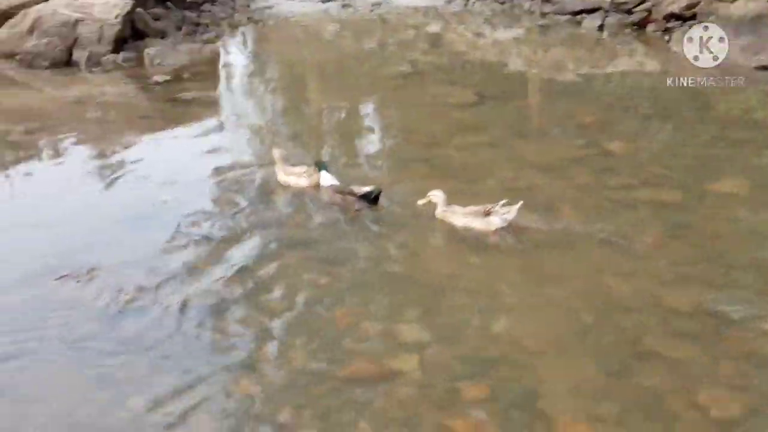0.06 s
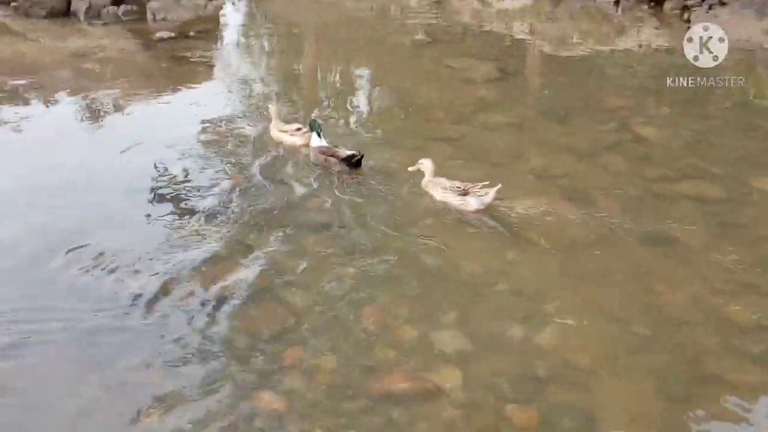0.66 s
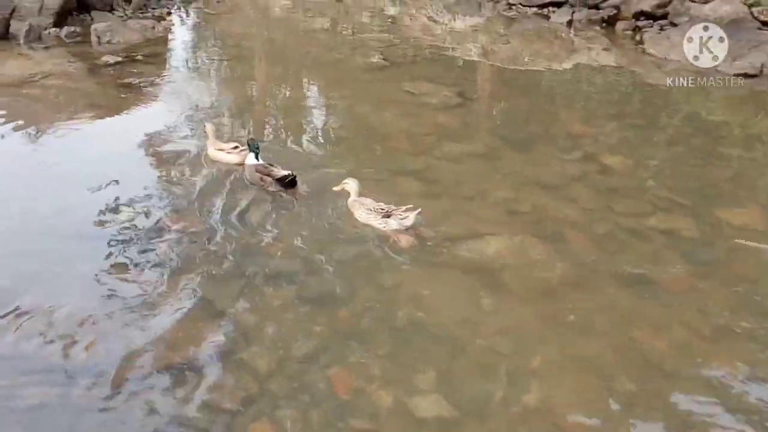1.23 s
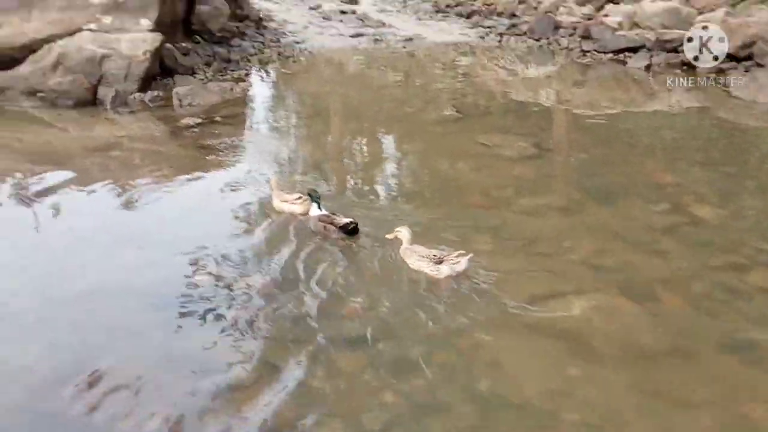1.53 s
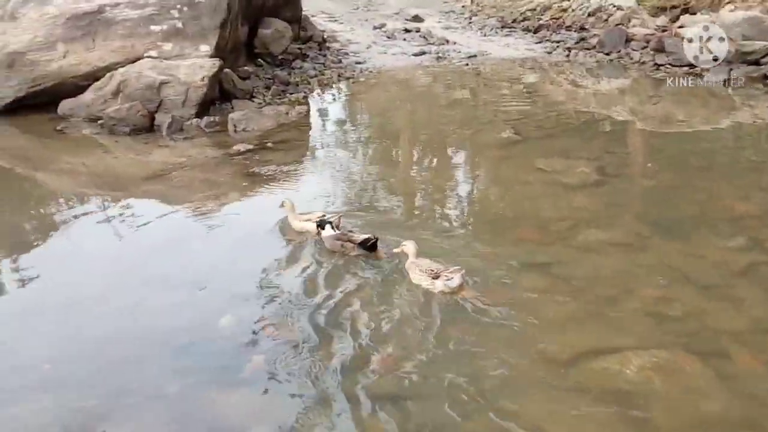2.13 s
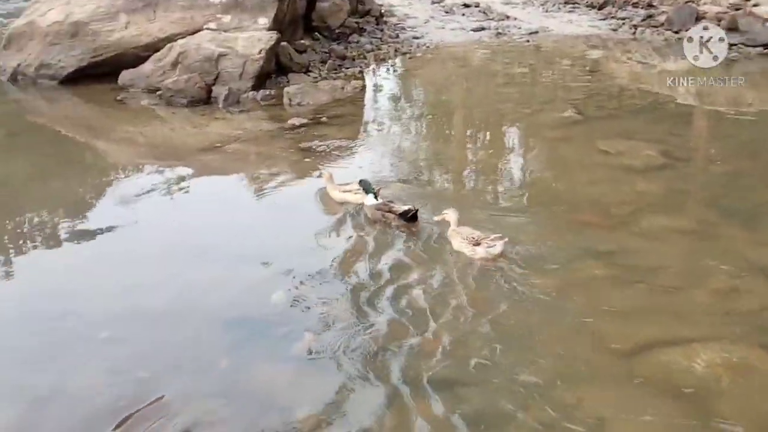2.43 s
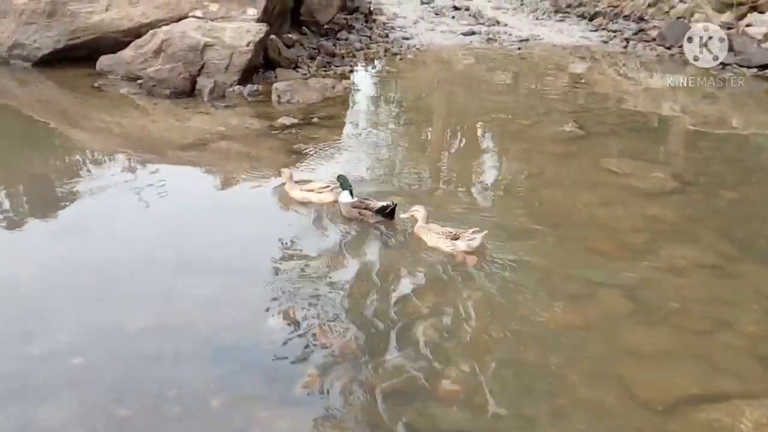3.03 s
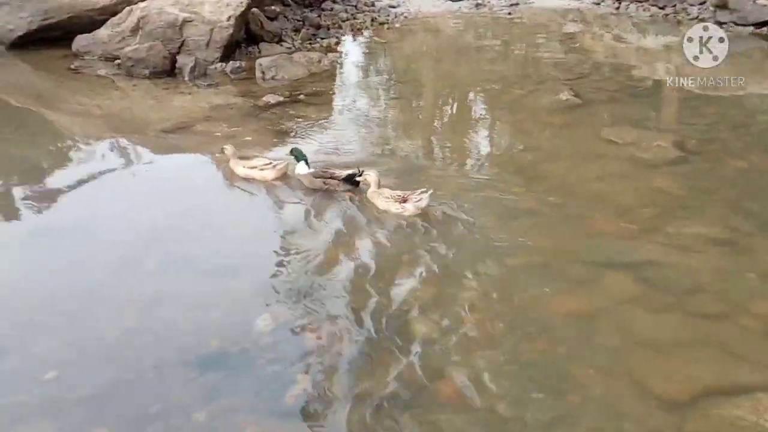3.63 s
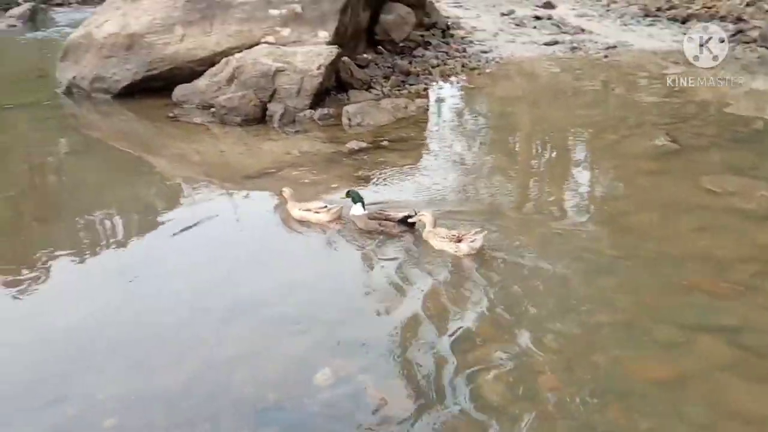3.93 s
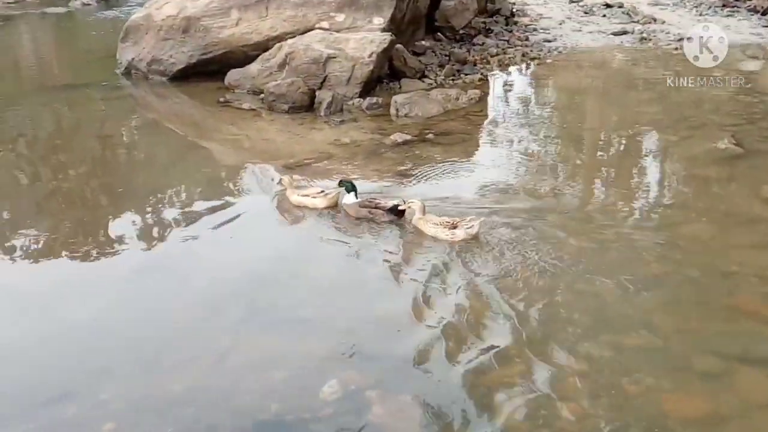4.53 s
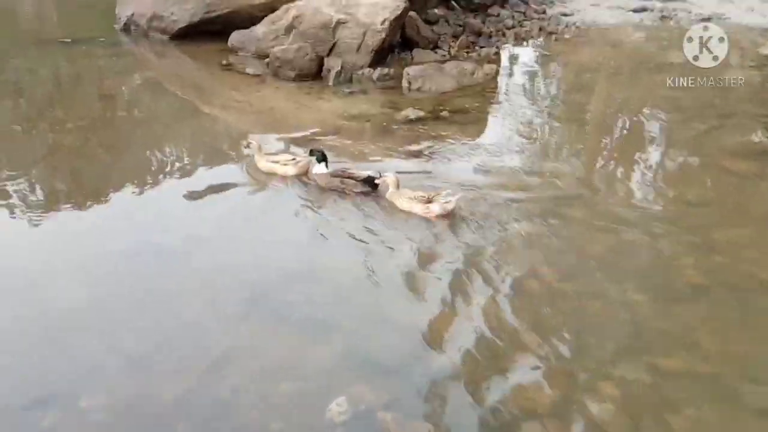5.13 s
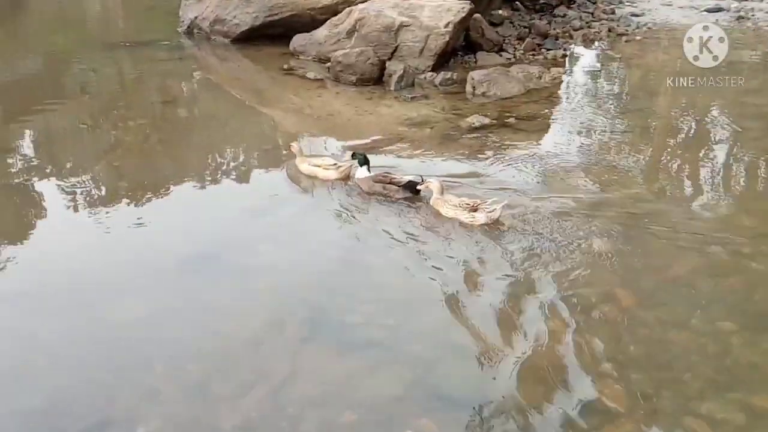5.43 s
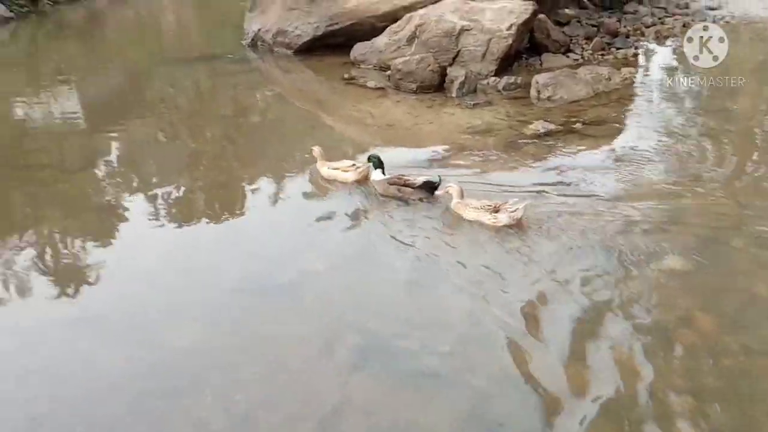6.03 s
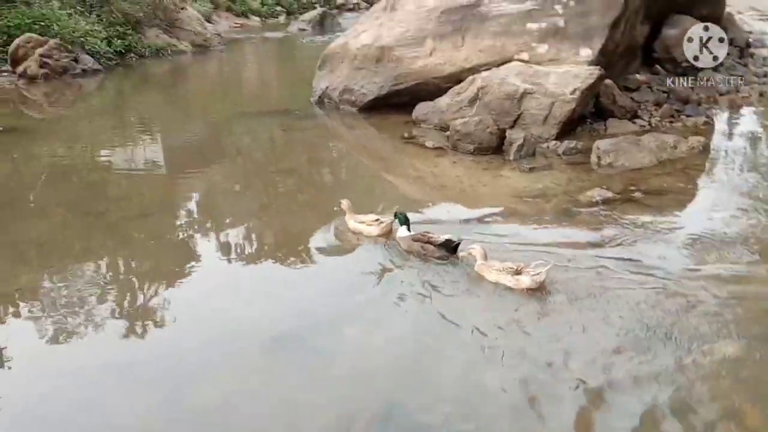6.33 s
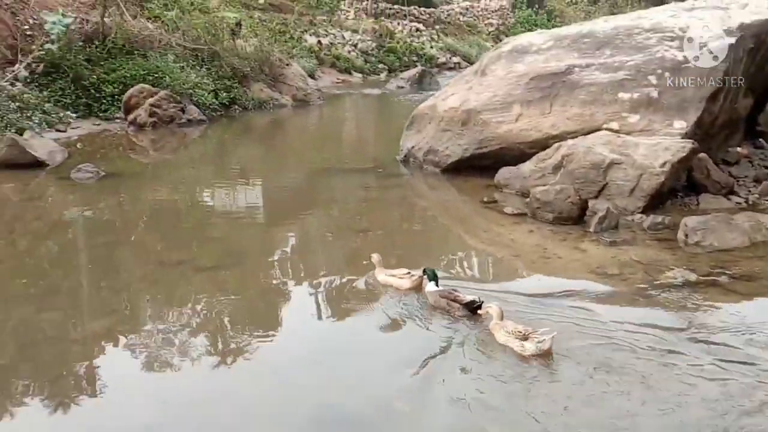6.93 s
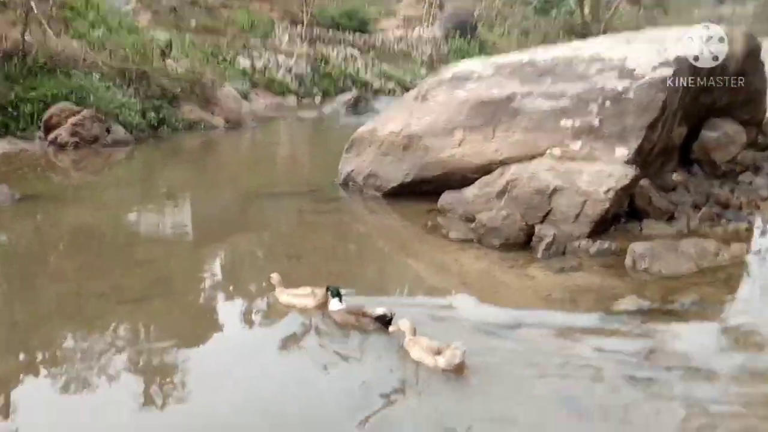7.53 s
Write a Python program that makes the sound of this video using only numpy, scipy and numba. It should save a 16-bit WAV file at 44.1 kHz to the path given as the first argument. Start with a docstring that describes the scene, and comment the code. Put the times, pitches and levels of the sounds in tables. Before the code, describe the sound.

Slow wading steps push through shallow water in bubbly surges, with plops, pattering drips and keys clinking lightly.

```python
"""Wading a shallow stream

Close to the microphone someone takes seven slow strides, each a surge of ringing bubbles from deep gulps
to fine spray. Cavities plop shut, drops slap the surface, feet thud on the bed and keys clink.
Insects hiss on the bank; a small bird and a far-off fowl call faintly, with short echoes off the rocks."""
import sys
import numpy as np
from scipy import signal
from scipy.fft import rfft, irfft
from scipy.io import wavfile
from numba import njit

SR = 44100
rng = np.random.default_rng(int(sys.argv[2]) if len(sys.argv) > 2 else 0)


def output_pcm(signal):
    """Save a mono or channel-first signal as 16-bit PCM at the path in sys.argv[1].

    Samples are clipped to [-1, 1] before scaling.
    """
    pcm = np.clip(np.atleast_2d(signal).T, -1, 1) * 32767
    wavfile.write(sys.argv[1], SR, np.round(pcm).astype(np.int16))


N = 342216
TIME = np.arange(N) / SR

# One surge of water per stride, and a weak second push after the sixth: leg enters t/s, crest t/s, hold/s,
# leg stops t/s, entry boost/dB, then base level/dB of gulps, slosh, splash, spray, mist, trickle
STRIDES = [(-.3, 0, .2, .62, 0, -51.5, -51, -58.5, -69, -78.5, -68),
           (0.859, 1.038, .4, 1.65, 3, -67, -58.5, -65.5, -81, -95, -71),
           (2.05, 2.282, .25, 2.82, 0, -53, -52.5, -59.5, -71.5, -78, -65),
           (3.241, 3.55, .07, 3.96, -.5, -57.5, -53, -58, -77.5, -94.5, -62.5),
           (4.32, 4.581, .28, 5.03, 0, -57, -55, -60, -68, -77, -69),
           (5.459, 5.769, .13, 6.0, -4, -53.5, -49.5, -55.5, -71, -85.5, -68.5),
           (5.98, 6.091, .06, 6.32, 2, -66, -58.5, -65, -80, -93, -74),
           (6.659, 6.802, .28, 7.3, -1, -63, -55, -60, -68.5, -79, -69)]


def undb(db):
    """Decibels to gain."""
    return 10 ** (np.asarray(db) / 20)


def unit(x):
    """Scale to rms 1."""
    return x / np.sqrt(np.mean(x ** 2) + 1e-30)


def gain_at(hz, spectrum):
    """Gain of a (f/Hz, level/dB) spectrum, read on a log-frequency axis."""
    f, db = np.transpose(spectrum)
    return undb(np.interp(np.log(np.maximum(hz, 1)), np.log(f), db))


def noise(spectrum):
    """Noise with the given spectrum, at rms 1."""
    hz = np.arange(N // 2 + 1) * SR / N
    return unit(irfft(rfft(rng.standard_normal(N)) * gain_at(hz, spectrum), N))


def band(x, lo_hz, hi_hz, order=2):
    """Causal band-pass."""
    sos = signal.butter(order, [lo_hz, min(hi_hz, .48 * SR)], "band", fs=SR, output="sos")
    return signal.sosfilt(sos, x + 1e-18)


@njit
def high_pass(x, hz, damping):
    """State-variable high-pass with a moving edge; low damping makes the edge ring."""
    out, band_state, low_state = np.empty(N), 0., 0.
    for i in range(N):
        g = np.tan(np.pi * hz[i] / SR)
        mid = (band_state + g * (x[i] + 1e-18 - low_state)) / (1 + g * (g + damping))
        out[i] = x[i] - damping * mid - low_state - g * mid
        band_state, low_state = 2 * mid - band_state, low_state + 2 * g * mid
    return out


def walk(per_s):
    """Smooth random wander, spread near 1."""
    return np.interp(TIME * per_s, np.arange(4000), rng.standard_normal(4000))


def add(out, s, sound):
    """Mix a short sound in at time s."""
    i = max(int(s * SR), 0)
    out[i:i + len(sound)] += sound[:max(N - i, 0)]


def bank():
    """The quiet valley behind the stream: a broad, nearly steady hush."""
    # spectrum of the hush: f/Hz, relative level/dB
    hush = [(30, -11), (100, -3), (300, -5.5), (500, -9.5), (800, -12), (1200, -7.5), (1900, -3),
            (2800, -12), (5200, -15.5), (8000, -17.5), (15000, -23.5)]
    return noise(hush) * undb(-83 + 0.53 * walk(6.9))


def insects():
    """Insects on the bank: a narrow, flickering hiss near 6 kHz."""
    # spectrum of the chorus: f/Hz, relative level/dB
    chorus = [(5000, -43.5), (5500, -7), (5850, 3.5), (6400, -5), (6750, -11.5), (7250, -12.5),
              (7700, -41.5)]
    return noise(chorus) * undb(-78 + 1.1 * walk(5) + 2.8 * walk(35))


def calls(contours, octave_db, waver):
    """Gliding, slightly unsteady notes with a weaker octave."""
    out = np.zeros(N)
    for call in contours:
        s, hz, db = np.transpose(call)
        pitch = np.interp(TIME, s, hz) * (1 + waver * walk(180))
        phase = 2 * np.pi * np.cumsum(pitch) / SR
        amplitude = np.sqrt(2) * undb(np.interp(TIME, s, db, left=-200, right=-200))
        out += amplitude * (np.sin(phase) + undb(octave_db) * np.sin(2 * phase))
    return out


def fowl():
    """A fowl gives short calls far from the microphone."""
    # one contour per call: t/s, f/Hz, level/dB
    contours = [
        [(1.85, 720, -83), (1.88, 705, -87), (1.915, 695, -84), (1.94, 680, -85)],
        [(4.06, 691, -88), (4.09, 701, -61), (4.125, 756, -70.5), (4.19, 864, -62), (4.23, 770, -78),
         (4.28, 820, -101)],
        [(6.54, 1000, -88), (6.57, 940, -76), (6.63, 890, -75), (6.66, 880, -90)],
        [(7.33, 1037, -72.5), (7.38, 973, -69.5), (7.43, 951, -72), (7.47, 896, -67.5)],
        [(7.65, 710, -95), (7.68, 690, -78), (7.72, 657, -103)],
    ]
    return calls(contours, octave_db=-9.5, waver=0.0054)


def bird():
    """A small bird in the distance: two thin, high chirps."""
    # one contour per chirp: t/s, f/Hz, level/dB
    contours = [
        [(1.94, 6450, -80), (1.955, 7150, -69), (1.97, 7550, -90), (1.985, 7030, -77), (2.0, 6580, -61.5),
         (2.025, 6100, -88)],
        [(3.73, 6500, -105), (3.77, 7100, -73), (3.8, 6500, -72), (3.83, 6200, -85)],
    ]
    return calls(contours, octave_db=-59, waver=0.041)


def rocks(x, wet_db, t60, delay_s=0.0091):
    """The direct sound plus scattered echoes from boulders and banks."""
    t = TIME[:SR]
    echo = band(rng.standard_normal(len(t)), 250, 3200, order=1) * undb(-60 * t / t60) * (t > delay_s)
    return x + undb(wet_db) * signal.fftconvolve(x, echo / np.linalg.norm(echo))[:N]


def keys(ring_db=-6, tick_db=-6, tick_s=0.0073, rebound_db=-9, detune=.003):
    """A tick and a lighter rebound ring the keys; each contact favours other modes and detunes them."""
    # keys knocking together: t/s, base level/dB, boost of the modes above 7500 Hz/dB
    clinks = [(3.68, -62, 8.5), (3.957, -60.5, 3), (4.133, -58, 3), (5.565, -51.5, -5), (6.117, -59.5, -3),
              (6.152, -54.5, -7), (6.503, -47, -7), (7.1616, -45.5, 0.5), (7.5181, -49.5, 2.5)]
    # modes of the keys, brief bright ones and faint long ones: f/Hz, relative level/dB, t60/s
    modes = [(3380, -10.5, 0.014), (3555, -13.5, 0.12), (4500, -1.5, .022), (4740, -10, .03),
             (4880, -3, .035), (5500, -3, 0.031), (5520, -10, 0.092), (5720, 2.5, 0.092),
             (6130, -0.5, 0.029), (6300, -3, 0.062), (7275, -13, 0.099), (8200, -6.5, 0.083),
             (8940, -5, 0.035), (8700, -15, 0.17), (9840, -3, 0.054), (10300, -15, .036),
             (10760, -21, 0.066)]
    hz, mode_db, t60 = np.transpose(modes)
    out, t = np.zeros(N), TIME[:SR // 2]
    for s, db, high_db in clinks:
        rebound_s = rng.uniform(0.00456, 0.0144)
        for delay, blow_db in ((0, 0), (rebound_s, rebound_db)):
            pitch = hz * (1 + detune * rng.standard_normal(len(hz)))
            rings = np.sin(2 * np.pi * pitch[:, None] * t) * undb(-60 * t / t60[:, None])
            share_db = mode_db + high_db * (hz > 7500) + 2 * rng.standard_normal(len(hz))
            share = undb(share_db) * rng.choice([-1, 1], len(hz))
            tick = unit(band(rng.standard_normal(len(t)), 3100, 7100, order=3)) * np.exp(-t / tick_s)
            contact = undb(ring_db) * share @ rings + undb(tick_db) * tick
            add(out, s + delay, undb(db + blow_db) * contact)
    return out


def footfalls():
    """Dull thuds as the weight comes down on the stream bed."""
    # feet pressing on the bed: t/s, level/dB, length/s
    steps = [(2.035, -67.5, 0.05), (3.81, -69, 0.22), (4.32, -80, 0.12), (4.46, -67.5, 0.25),
             (6.894, -50.5, 0.025), (6.9, -66.5, 0.16)]
    press = sum(undb(db) * np.sin(np.pi * np.clip((TIME - s) / length, 0, 1)) for s, db, length in steps)
    return press * unit(band(rng.standard_normal(N), 112, 194, order=4))


@njit
def bubbles(start, hz, size, t60, rise, swell_cycles):
    """Each bubble swells, then rings down; nearing the surface, its pitch gains the share rise per t60."""
    out = np.zeros(N)
    for k in range(len(start)):
        first = int(start[k] * SR) + 1
        swell, decay = hz[k] / swell_cycles, np.log(1000) / t60[k]
        crest = decay / (decay + 8 * swell)
        peak = (1 - crest) ** 8 * crest ** (decay / swell)  # maximum of the envelope
        for i in range(max(first, 0), min(first + int(2 * t60[k] * SR), N)):
            t = i / SR - start[k]
            shape = (1 - np.exp(-swell * t)) ** 8 * np.exp(-decay * t) / peak
            out[i] += size[k] * shape * np.sin(2 * np.pi * hz[k] * t * (1 + rise[k] * t / t60[k] / 2))
    return out


def cloud(db, lo_hz, hi_hz, per_s, cycles, rise, spread_db, wash_db, crowding=.38):
    """A swarm of bubbles, more and louder with stronger stirring, over a wash of countless tiny ones."""
    # spectrum of stirred water: f/Hz, relative level per Hz/dB
    water = [(200, -1), (260, -15.5), (350, -4), (500, -4.5), (750, -0.5), (1130, 3), (1600, -5.5),
             (2000, -9), (3200, -11.5), (5000, -13), (6200, -11.5), (7700, -34), (9800, -29.5),
             (12500, -51), (15500, -47.5)]
    strength = undb(db)
    density = (strength / strength.max()) ** crowding + 1e-4
    density *= per_s / density.mean()
    count = int(per_s * N / SR)
    when, pitch, weight, ring, climb = rng.random((count, 5)).T
    quantile = (np.arange(count) + 3 * when - 1) / count
    start = np.interp(quantile, np.cumsum(density) / density.sum(), TIME)
    hz = lo_hz * (hi_hz / lo_hz) ** pitch
    t60 = cycles * 3 ** (2 * ring - 1) / hz
    size = undb(-spread_db * np.log(.03 + .97 * weight)) * gain_at(hz, water) * np.sqrt(hz / t60)
    size *= np.interp(start, TIME, strength / np.sqrt(density))
    glide = rise * climb ** 2 * ring  # most bubbles hold their pitch; a few long ones glide
    swarm = unit(bubbles(start, hz, size, t60, glide, swell_cycles=1.06))
    wash = unit(band(noise(water), lo_hz, hi_hz, order=4) * strength)
    return unit(swarm + undb(wash_db) * wash) * np.sqrt(np.mean(strength ** 2))


def surge(crest_db, lead_db, ease_db, die_db_per_s):
    """Level in dB: each stride builds to its crest, holds, eases as the leg slows, then dies away."""
    entry_s = .03  # the leg breaks the surface this fast
    power = np.full(N, 1e-12)
    for (enter, crest, hold, stop, entry_db, *_), db in zip(STRIDES, crest_db):
        span = slice(max(int(enter * SR), 0), int((stop + .5) * SR))
        t = TIME[span]
        shape_db = np.interp(t, [enter, crest, crest + hold, stop], [entry_db - lead_db, 0, 0, -ease_db])
        shape_db -= die_db_per_s * np.maximum(t - stop, 0)
        power[span] += (undb(db + shape_db) * np.minimum((t - enter) / entry_s, 1)) ** 2
    return 10 * np.log10(power)


def trickle():
    """Water patters off the lifted leg; the last bubbles and stray drips ring on into the pause."""
    flow_db = surge(np.transpose(STRIDES)[-1], lead_db=20, ease_db=1.4, die_db_per_s=58)
    drips = cloud(flow_db - 0.5, 1820, 11140,
                  per_s=260, cycles=80, rise=0.078, spread_db=3, wash_db=0, crowding=.5)
    last_bubbles = cloud(flow_db - 4.5, 440.5, 1244,
                         per_s=26, cycles=69, rise=0.31, spread_db=6, wash_db=-15, crowding=.2)
    stray_drips = cloud(flow_db - 3, 1255, 2235,
                        per_s=60, cycles=60, rise=0.11, spread_db=2.5, wash_db=-9.5, crowding=.1)
    return drips + last_bubbles + stray_drips


def drops(slap_s=0.0016, cycles=14, ring_db=-4, slap_db=-6):
    """A falling drop slaps the surface and traps a tiny bubble; small drops sound brighter."""
    # drops landing: t/s, base level/dB, f/Hz
    landings = [(0.386, -39, 5800), (0.5078, -39.5, 5530), (0.972, -50, 6200), (1.068, -48.5, 5800),
                (1.1917, -47, 3250), (1.258, -50, 6300), (1.3468, -48, 3320), (1.431, -40.5, 3140),
                (1.491, -47.5, 5340), (1.3772, -42, 6550), (1.619, -37, 4560), (2.0833, -50.5, 5400),
                (2.255, -46, 11000), (2.308, -38.5, 4330), (2.581, -42.5, 6640), (2.6128, -35.5, 4200),
                (2.615, -44, 12000), (2.917, -55, 8000), (3.4106, -47, 3680), (3.5612, -37, 4030),
                (3.583, -45, 4450), (3.643, -34, 4450), (3.815, -43.5, 6500), (3.8516, -43.5, 6500),
                (4.431, -40, 5800), (4.463, -41, 4340), (4.542, -37, 3250), (4.588, -35, 3930),
                (4.6044, -38, 5770), (4.698, -38, 3530), (4.794, -41, 3900), (4.984, -41, 3800),
                (4.638, -34.5, 4830), (4.7343, -31.5, 5660), (4.808, -39.5, 6250), (4.861, -30.5, 6100),
                (5.021, -40, 5860), (5.8175, -37, 5960), (5.884, -38, 4100), (6.2353, -48, 8950),
                (6.725, -44, 6300), (6.779, -33, 5400), (6.801, -32, 4540), (6.876, -36.5, 5700),
                (6.82, -44, 3400), (6.975, -36, 5550), (7.079, -40, 3400)]
    slaps, t = np.zeros(N), TIME[:1000]
    for s, db, hz in landings:
        slap = undb(db + slap_db) * np.exp(-t / slap_s) * rng.standard_normal(len(t))
        add(slaps, s, band(slap, hz / 2.2, hz * 1.6))
    s, db, hz = np.array(landings, float).T.copy()
    rise = np.full(len(s), .1)
    return slaps + bubbles(s, hz, undb(db + ring_db), cycles / hz, rise, swell_cycles=0.97)


def splashes(attack_s=0.0059, mist_db=-16):
    """Thrown water lands all at once: a quick burst of crackle with fine mist above it."""
    # crests breaking in a sheet of spray: t/s, level/dB, decay time/s
    sheets = [(0.035, -54.5, .015), (.21, -55, .04), (.594, -63, .012), (0.964, -61.5, .03),
              (1.177, -57.5, .025), (1.368, -57.5, .015), (1.614, -58, 0.011), (2.072, -65, .018),
              (2.295, -54, .025), (2.426, -56, .02), (2.475, -55.5, .025), (2.912, -63.5, .018),
              (3.407, -60.5, .035), (3.556, -49, .014), (3.577, -51, 0.02), (4.081, -64, .025),
              (4.322, -64, .012), (4.519, -57, 0.013), (4.6, -56, .04), (4.728, -51.5, .03),
              (4.785, -56, .02), (4.852, -55, .02), (5.811, -53, .035), (5.869, -55, 0.038),
              (6.067, -58.5, .018), (6.226, -65.5, .03), (6.752, -60.5, .02), (6.775, -54.5, .03),
              (6.865, -56, .02), (6.966, -57.5, .02), (7.082, -55.5, .025)]
    strength, t = np.full(N, 1e-7), TIME[:SR // 3]
    for s, db, decay_s in sheets:
        envelope = np.minimum(t / attack_s, 1) * np.exp(-np.maximum(t - attack_s, 0) / decay_s)
        add(strength, s, undb(db) * envelope)
    level_db = 20 * np.log10(strength)
    crackle = cloud(level_db, 1654, 7180,
                    per_s=500, cycles=15, rise=.1, spread_db=2, wash_db=2, crowding=.8)
    mist = cloud(level_db + mist_db, 7640, 15600,
                 per_s=480, cycles=7, rise=.1, spread_db=14.5, wash_db=-4.5, crowding=0.87)
    return crackle + mist


def gurgles(count=14, spread_octaves=0.51, cycles=22, rise=0.2):
    """A cavity breaks up into a quick knot of bubbles of similar size."""
    # knots of bubbles: t/s, top level of a bubble/dB, length/s, centre f/Hz
    knots = [(.235, -44, .03, 1520), (0.859, -55.5, 0.029, 1350), (0.894, -57, .06, 990),
             (.975, -55, 0.053, 2380), (1.677, -63.5, 0.048, 1105), (1.764, -60.5, 0.022, 1620),
             (2.051, -51, 0.041, 1710), (2.103, -51, .035, 521), (3.227, -55.5, 0.042, 1264),
             (3.247, -65, 0.039, 2400), (3.296, -55, 0.068, 1390), (4.302, -58, .012, 1690),
             (4.317, -58, .03, 1930), (5.494, -52, .06, 1510), (5.569, -52, 0.043, 1485),
             (5.719, -45.5, 0.076, 1690), (7.437, -61, 0.027, 840)]
    s, db, length, centre_hz = np.repeat(np.array(knots, float), count, axis=0).T
    when, pitch, weight = rng.random((len(s), 3)).T
    start = s + length * (np.arange(len(s)) % count + when) / count
    hz = centre_hz * 2 ** (spread_octaves * (2 * pitch - 1))
    return bubbles(start, hz, undb(db) * np.sqrt(weight), cycles / hz, rise * weight, swell_cycles=1.16)


def plops(max_rise_per_s=16):
    """Single cavities close with a round, mostly rising note; large pockets ring low and long."""
    # the loudest bubbles: t/s, f/Hz, peak level/dB, t60/s, pitch rise over the ring/share (capped below)
    cavities = [(0.014, 318, -40, 0.14, 0.3), (.038, 1039, -34.5, 0.029, 0.85),
                (.06, 337.2, -42.5, .06, -0.4), (.155, 344, -39, 0.065, 0.5), (0.159, 930, -37, 0.039, 0.2),
                (.165, 422.4, -39.5, 0.27, 2.26), (0.167, 497, -36.5, 0.072, 0.7),
                (0.236, 1080, -38, 0.05, 0.048), (0.386, 1880, -35.5, 0.0072, 1.1),
                (.406, 1130, -38.5, 0.016, 0.083), (.463, 1330, -46, 0.026, -0.3),
                (.491, 522, -47.5, 0.081, -0.7), (0.526, 386, -45, 0.19, 0.55), (.583, 1150, -49, 0.03, 2),
                (.603, 760, -52, .035, 0.5), (.66, 640, -64, .14, 1.5), (0.682, 1355, -45.5, 0.035, 0.29),
                (0.681, 3320, -50, 0.015, 0.13), (.8485, 1140, -31, 0.014, 0.5),
                (.866, 2540, -45.5, 0.018, 0.08), (.9, 428, -53.5, 0.073, .2),
                (.945, 430, -50.5, 0.13, 0.8), (.986, 900, -40, 0.0055, 0), (1.132, 599, -47.5, 0.21, 2),
                (1.161, 1610, -33.5, 0.002, 0.84), (1.179, 1340, -41.5, 0.019, .17),
                (1.183, 2370, -46, 0.016, 0.7), (1.223, 1960, -42, 0.013, 0.5),
                (1.231, 439, -40, 0.13, 0.24), (1.297, 512, -39.5, 0.078, 0),
                (1.303, 2050, -41.5, 0.016, 0.4), (1.322, 515, -38, 0.057, 1.5),
                (1.364, 676, -47, 0.21, 0.5), (1.375, 1050, -39.5, 0.03, 1.5),
                (1.426, 830, -40, 0.015, 0.29), (1.447, 330, -50.5, 0.39, 1.2), (1.545, 860, -46, .025, .1),
                (1.578, 623, -51, 0.044, .2), (1.62, 2010, -38, 0.013, 0), (1.631, 695, -39, 0.0087, 0.11),
                (1.652, 245, -56, .04, .2), (1.7, 860, -51.5, .035, 0.5), (1.735, 218, -54, 0.039, 0.6),
                (1.775, 1093, -47, 0.062, 1), (1.777, 880, -53.5, 0.086, .05),
                (1.825, 976, -41, 0.032, 0.023), (2.041, 1085, -34, 0.013, 0.015),
                (2.042, 1390, -33, 0.0031, 0.51), (2.056, 244, -38, 0.027, 0.015),
                (2.113, 602, -43.5, 0.053, -0.2), (2.231, 1040, -36, 0.018, 0.29),
                (2.252, 316, -34, 0.013, 0.055), (2.358, 293, -36, 0.086, 0), (2.619, 261, -38, 0.065, 0.3),
                (2.322, 552, -44, .05, -0.4), (2.485, 520, -47, 0.053, -0.3),
                (2.691, 997, -47, 0.037, -1.1), (2.86, 1027, -55, 0.077, 1), (2.912, 917, -53, 0.1, 0.5),
                (2.95, 1480, -77, 0.041, -2), (3.075, 1690, -59.5, 0.048, 2),
                (3.219, 1620, -47.5, 0.02, 0.18), (3.231, 1380, -50, 0.016, 0.5),
                (3.247, 540, -45.5, .03, .1), (3.255, 545, -41, 0.0088, -0.5),
                (3.26, 426, -46.5, 0.14, 1.2), (3.311, 382, -45.5, 0.12, 0.23),
                (3.337, 780, -45.5, .025, 0.7), (3.452, 398, -44.5, 0.083, 0.6),
                (3.47, 1190, -37, 0.0038, -1), (3.558, 986, -34.5, 0.045, 0.72),
                (3.566, 1840, -31, 0.0032, 0.15), (3.581, 2060, -35, 0.0029, 0.15),
                (3.562, 268, -49, 0.03, .1), (3.603, 235, -51.5, .03, 0.2), (3.628, 510, -37, 0.0082, 0),
                (3.714, 655, -43, 0.026, 0.6), (3.773, 2150, -43.5, 0.019, 0.37),
                (3.846, 675, -39.5, 0.022, 0.065), (4.305, 965, -47, 0.017, 0.05),
                (4.338, 444, -51, 0.099, 0.8), (4.4, 1030, -49.5, 0.073, 1), (4.405, 396, -55, 0.18, 0.12),
                (4.434, 567, -45, 0.1, -0.3), (4.51, 391, -46, 0.12, 0.64), (4.459, 3270, -42, 0.021, 0.15),
                (4.571, 496, -38.5, 0.036, -0.1), (4.609, 2420, -39, 0.0034, -0.5),
                (4.733, 2040, -46.5, .025, 0.4), (4.595, 313, -45, 0.098, -0.1),
                (4.684, 770, -37, 0.021, 0.5), (4.697, 493, -36, 0.043, 0.61),
                (4.713, 441, -43.5, 0.12, -0.3), (4.754, 1400, -33, 0.019, 0.049),
                (4.755, 2640, -31, 0.0056, 0.15), (4.78, 1015, -42.5, 0.051, 0.24),
                (4.81, 1130, -43, 0.072, 1.6), (4.82, 586, -37.5, 0.04, 0.3),
                (4.837, 549, -34.5, 0.082, 0.5), (4.833, 328.4, -39, 0.11, 1.5),
                (4.862, 500, -40.5, 0.14, 2.2), (4.863, 950, -35, 0.0096, -0.7),
                (4.935, 1710, -40, 0.02, 0.63), (4.941, 653, -41.5, 0.041, 1),
                (4.958, 820, -40, 0.065, 0.38), (5.021, 618, -47, 0.099, 0.4),
                (5.023, 820, -39.5, 0.013, 0.5), (5.0, 359, -48.5, 0.11, 0.9), (5.023, 2390, -48, .018, 0),
                (5.17, 943, -57, 0.076, 0.7), (5.39, 785, -63, 0.065, 0.6), (5.459, 500, -54.5, 0.036, 0.5),
                (5.471, 396, -41, 0.033, 0.12), (5.542, 1150, -50, 0.054, 3.3),
                (5.595, 285, -45.5, 0.043, 0), (5.564, 417, -45, 0.02, -0.4),
                (5.517, 439, -48.5, 0.14, 0.2), (5.659, 279, -39.5, 0.07, 0.9),
                (5.724, 377.4, -35.5, 0.14, 1.2), (5.712, 742, -40.5, 0.13, 0.9),
                (5.773, 344, -39.5, 0.02, 1), (5.769, 610, -34.5, 0.033, 0.3),
                (5.869, 473, -35, 0.031, 0.5), (5.886, 497, -42.5, 0.14, -0.2),
                (5.904, 704, -32, 0.02, 0.25), (6.069, 2300, -36.5, 0.0021, 0.014),
                (6.102, 450, -41.5, 0.027, 0), (6.021, 1330, -41, 0.017, 0.096),
                (6.17, 382, -53.5, 0.34, 0.72), (6.229, 236, -53, 0.041, 0.27),
                (6.252, 1180, -45.5, 0.022, 0.13), (6.295, 377.5, -45.5, 0.11, 0.47),
                (6.297, 694, -57, 0.13, 0.2), (6.328, 1970, -57.5, 0.059, -1),
                (6.819, 330, -47, 0.02, 0.014), (6.901, 860, -31.5, 0.013, 0.25),
                (6.901, 2160, -31, 0.0078, 0.85), (6.9015, 2920, -37, .004, 0.4),
                (6.904, 1820, -31, 0.015, 0.35), (6.933, 1950, -46, 0.0065, 0.7),
                (6.966, 642, -39.5, 0.092, 2.5), (7.006, 544, -39, 0.13, 1.4),
                (7.051, 1400, -39, 0.018, 1.2), (7.117, 1782, -33.5, 0.0018, 0.35),
                (7.203, 1030, -27, 0.0045, 0.087), (7.225, 450, -55.5, 0.097, 0.028),
                (7.27, 713, -48.5, 0.055, 0.2), (7.299, 1280, -41.5, 0.0055, 2),
                (7.445, 763, -47, 0.029, 0.5)]
    s, hz, db, t60, rise = np.array(cavities, float).T.copy()
    rise = np.minimum(rise, max_rise_per_s * t60)  # brief bubbles have no time to glide
    start = s - 2 / hz  # the swell begins two cycles early
    return bubbles(start, hz, undb(db), t60, rise, swell_cycles=1.25)


def hollow(x):
    """The hollow behind the leg rings at its own pitch and cuts the bubbles larger than itself."""
    # pitch of the largest air pocket dragged under, one list per stride: t/s, f/Hz
    deepest = [
        [(0, 204), (.27, 210), (.4, 305), (.6, 340)],
        [(.88, 332), (1.0, 340), (1.06, 554), (1.12, 395), (1.35, 440), (1.5, 317)],
        [(2.06, 242), (2.17, 316), (2.26, 213), (2.78, 245), (2.9, 430)],
        [(3.25, 323), (3.45, 346), (3.58, 257), (3.75, 390), (3.95, 435)],
        [(4.33, 342), (4.6, 276), (4.75, 357), (4.87, 340), (4.93, 484), (5.02, 313)],
        [(5.47, 318), (5.62, 235), (5.91, 224), (5.99, 544), (6.06, 530), (6.09, 347)],
        [(6.7, 403), (6.83, 275), (7.0, 333), (7.3, 460)],
    ]
    s, hz = np.concatenate(deepest).T
    edge_hz = np.interp(TIME, s, hz)
    ringing = high_pass(x, edge_hz, damping=0.61)
    return high_pass(ringing, edge_hz, damping=np.sqrt(2))


def plunges(full_db=-52, steepness=1.6):
    """Only the hardest part of a stride drags under the largest, lowest pockets of air."""
    gulp_db = np.transpose(STRIDES)[5]
    crest_db = full_db - 5 + steepness * (gulp_db - full_db)
    level_db = surge(crest_db, lead_db=26, ease_db=31, die_db_per_s=240)
    return cloud(level_db, 222.4, 333, per_s=28, cycles=17, rise=1.0, spread_db=1, wash_db=-13.5)


def wading():
    """The leg drags air under: big pockets gulp, middling ones slosh, the crest splashes and sprays."""
    gulp_db, slosh_db, splash_db, spray_db, mist_db = np.transpose(STRIDES)[5:10]
    heave_db = 1.67 * walk(14)  # the water heaves unevenly
    burst_db = heave_db + 3 * walk(45)  # the crest breaks in quick bursts
    # glugs and babble lie between their neighbours in size and in strength
    glug_db = slosh_db + 0.32 * (gulp_db - slosh_db)
    babble_db = slosh_db + 0.37 * (splash_db - slosh_db)
    gulps = cloud(surge(gulp_db - 4.5, lead_db=8, ease_db=15, die_db_per_s=190),
                  326.3, 463.3, per_s=45, cycles=21.4, rise=.7, spread_db=2, wash_db=-15)
    glugs = cloud(surge(glug_db - 1.03, lead_db=9.8, ease_db=14, die_db_per_s=160) + heave_db,
                  462, 744, per_s=66, cycles=36, rise=.7, spread_db=0.5, wash_db=-15)
    slosh = cloud(surge(slosh_db - 1, lead_db=12, ease_db=12, die_db_per_s=110) + heave_db,
                  735, 1241, per_s=95, cycles=36, rise=.49, spread_db=2, wash_db=-15)
    babble = cloud(surge(babble_db - 2, lead_db=17, ease_db=9.8, die_db_per_s=115) + heave_db,
                   1269, 2247, per_s=240, cycles=46, rise=.25, spread_db=5.5, wash_db=-9.5)
    splash = cloud(surge(splash_db, lead_db=21, ease_db=16, die_db_per_s=110) + burst_db - 2.5,
                   2262, 6684, per_s=1200, cycles=46, rise=.175, spread_db=6.3, wash_db=-8, crowding=.5)
    spatter_db = burst_db + 2.5 * walk(70)
    spray = cloud(surge(spray_db, lead_db=33, ease_db=18, die_db_per_s=74) + spatter_db,
                  6635, 11440, per_s=900, cycles=130, rise=.035, spread_db=7, wash_db=-7)
    mist = cloud(surge(mist_db, lead_db=33, ease_db=18, die_db_per_s=74) + spatter_db,
                 10360, 16200, per_s=730, cycles=14, rise=.1, spread_db=9, wash_db=-26.5)
    return gulps + glugs + slosh + babble + splash + spray + mist


def scene():
    """One microphone at the stream: the wader close and nearly dry, the birds far off with more echo."""
    bubbling = hollow(wading() + plunges() + trickle()) + plops() + gurgles()
    water = band(bubbling, 120, 22000, order=3)  # bubbles near the surface radiate almost no bass
    near = water + splashes() + drops() + footfalls() + keys()
    far = fowl() + bird()
    mix = rocks(near, wet_db=-18, t60=0.12) + rocks(far, wet_db=-5.5, t60=0.25) + bank() + insects()
    return mix[None]


def record(dry, top_hz=15850):
    """The phone that serves as microphone cuts the top of the treble."""
    return signal.sosfilt(signal.ellip(10, .2, 70, top_hz, fs=SR, output="sos"), dry)


dry = scene()
out = record(dry)
output_pcm(out)
```